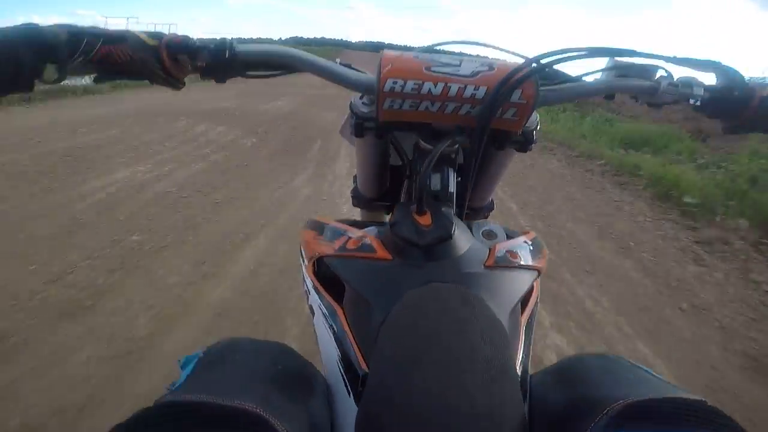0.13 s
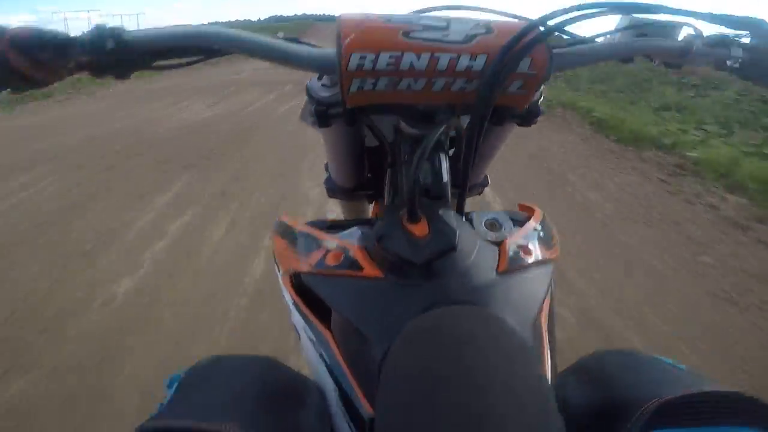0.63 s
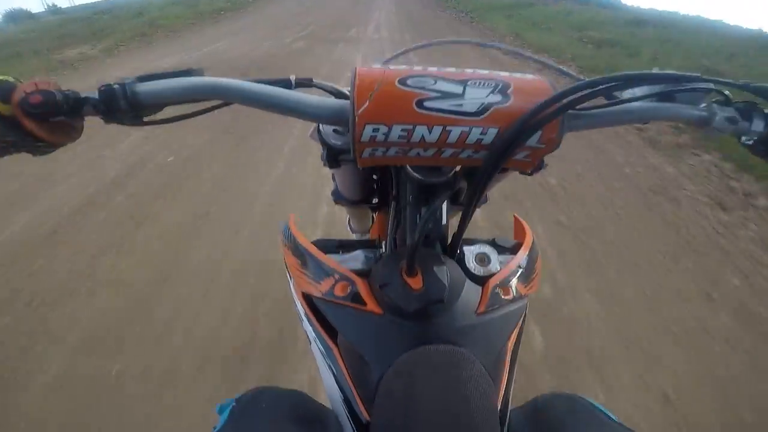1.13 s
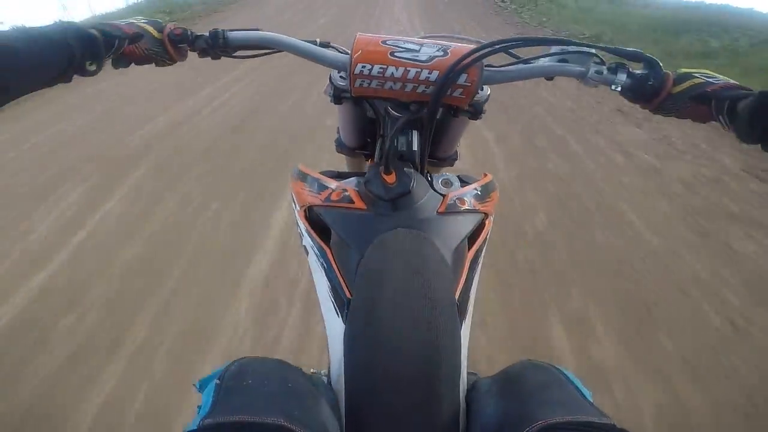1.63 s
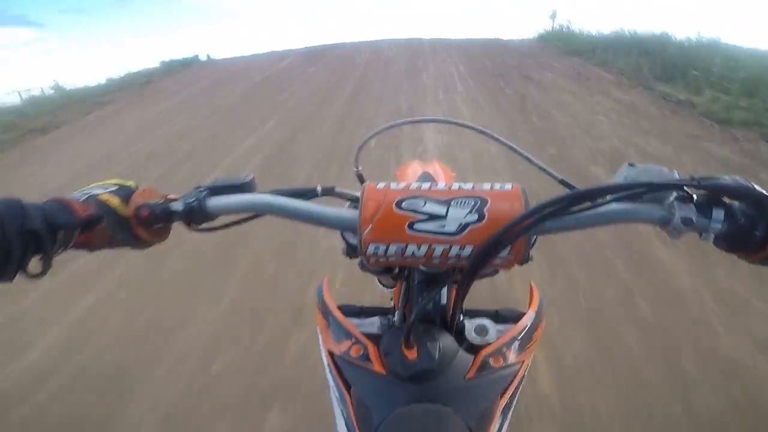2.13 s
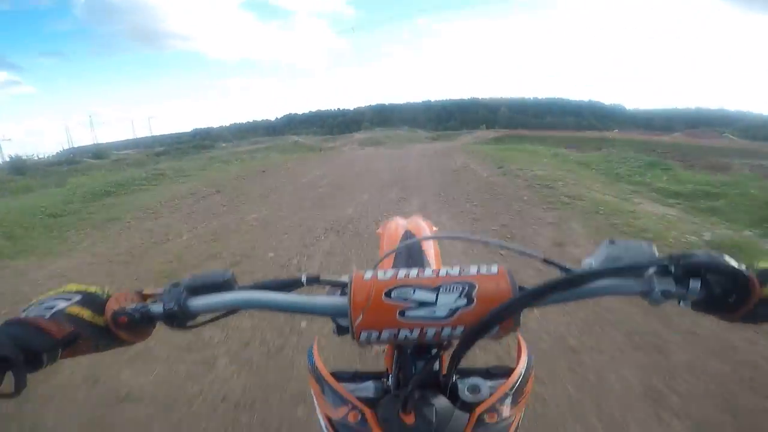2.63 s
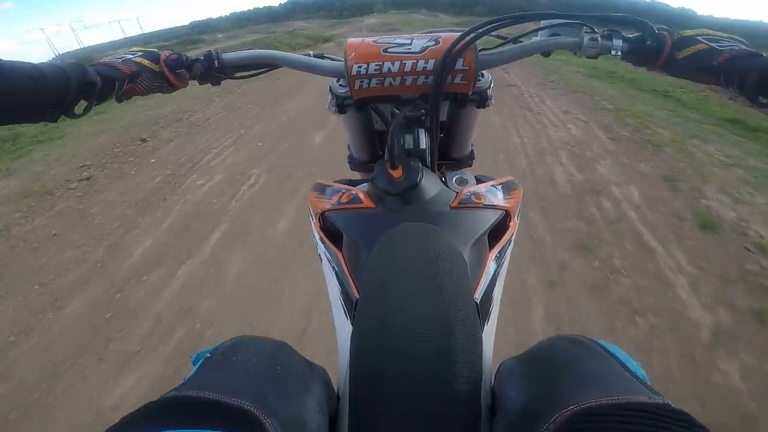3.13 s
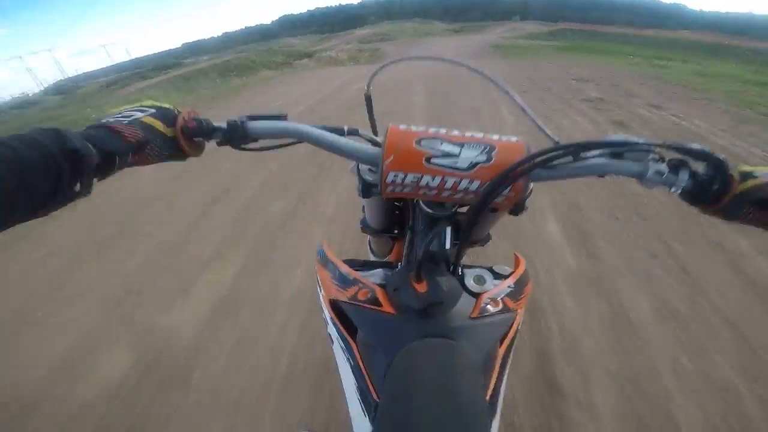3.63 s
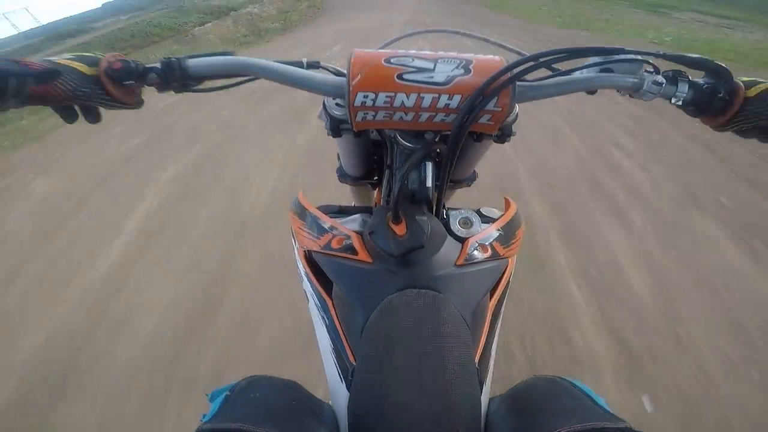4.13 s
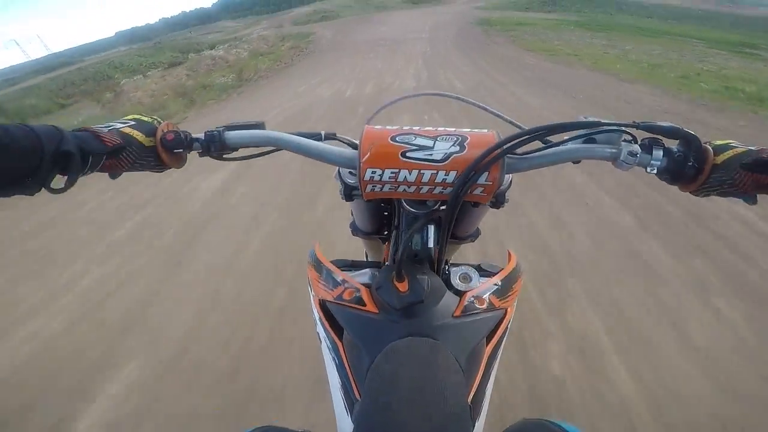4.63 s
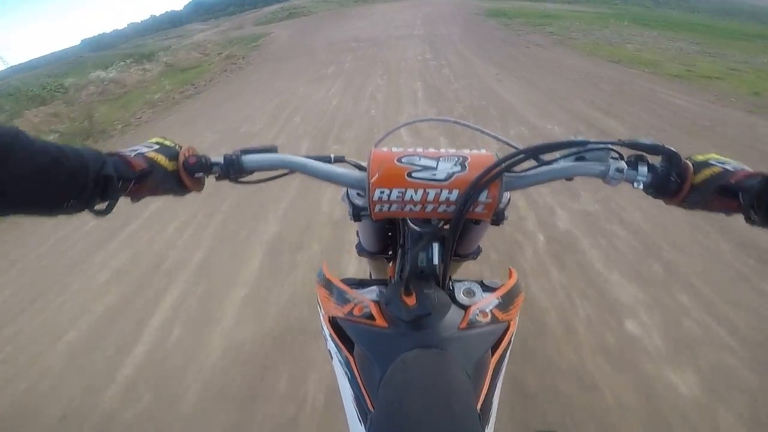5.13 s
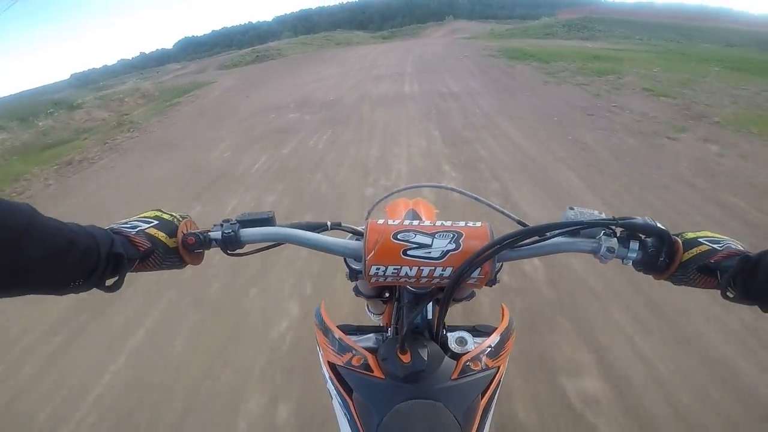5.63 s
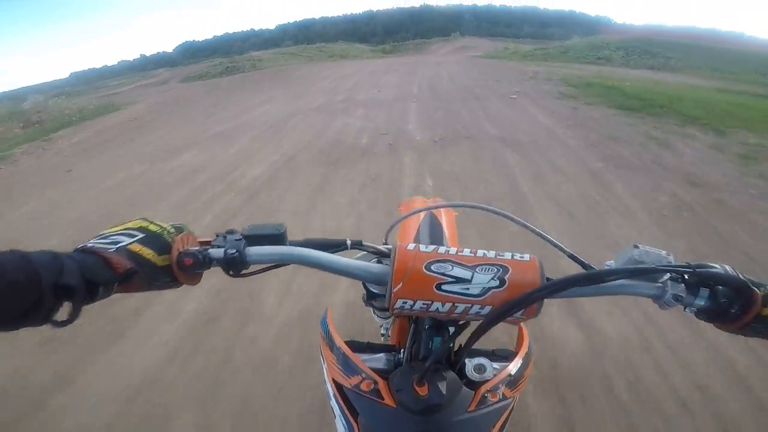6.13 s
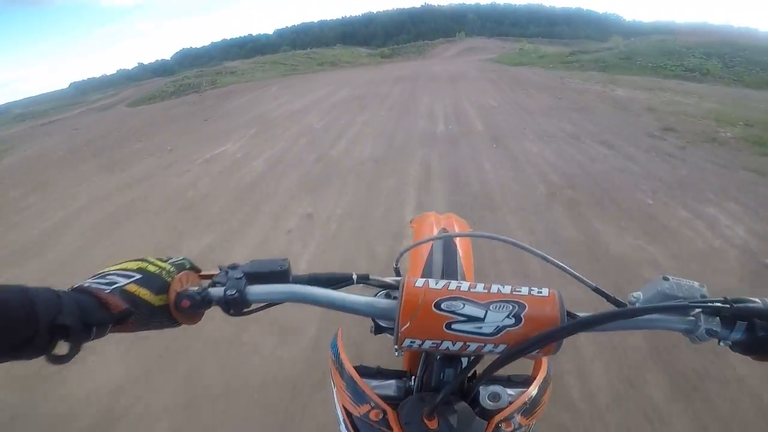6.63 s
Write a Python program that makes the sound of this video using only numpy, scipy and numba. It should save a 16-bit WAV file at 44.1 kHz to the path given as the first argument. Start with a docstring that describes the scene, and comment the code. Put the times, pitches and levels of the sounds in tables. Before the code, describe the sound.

Close onboard four-stroke motorbike: throaty exhaust revs in bursts, low wind thumps the microphone, hard bumps knock, then slow coasting putts.

```python
"""On a rider crossing rough ground, a cased camera hears the single-cylinder four-stroke dirt bike beneath.
Multiples of the firing rate excite the exhaust resonances; near idle each firing rings the pipe by itself.
Noise pulsing with the engine cycle passes through the case resonances as motor clatter. Wind noise buffets
the port, panel and case hum in narrow bands, and bumps push the mount and ring its modes.
One port hears it all; near the end the air noise of a second port fades in."""
import sys
import numpy as np
from scipy import signal
from scipy.fft import rfft, irfft
from scipy.io import wavfile
from scipy.ndimage import uniform_filter1d, minimum_filter1d
from numba import njit

SR = 44100
rng = np.random.default_rng(int(sys.argv[2]) if len(sys.argv) > 2 else 0)


def output_pcm(signal):
    """Save a mono or channel-first signal as 16-bit PCM at the path in sys.argv[1].

    Samples are clipped to [-1, 1] before scaling.
    """
    pcm = np.clip(np.atleast_2d(signal).T, -1, 1) * 32767
    wavfile.write(sys.argv[1], SR, np.round(pcm).astype(np.int16))


def linear_from_db(decibels):
    """Turn decibels (scalar or array-like) into linear amplitude factors; 0 gives 1."""
    return 10 ** (np.asarray(decibels, float) / 20)


N = 298116
T = np.arange(N) / SR


def unit(x):
    """Normalization: scale to rms 1."""
    return x / np.sqrt(np.mean(x ** 2))


def curves(table):
    """Linear interpolation: the columns of a table as sample-rate curves."""
    s, *columns = np.transpose(table)
    return [np.interp(T, s, c) for c in columns]


def colour(x, points):
    """Spectral shaping: zero-phase gain through (f/Hz, gain/dB) points on a logarithmic frequency axis."""
    hz, db = np.transpose(points)
    f = np.maximum(np.fft.rfftfreq(N, 1 / SR), 1)
    gain = linear_from_db(np.interp(np.log(f), np.log(hz), db))
    return irfft(rfft(x) * gain, N)


def walk(rate):
    """Slow random fluctuation: levels held 1 / rate s, smoothed twice over that time, rms 1."""
    k = int(SR / rate)
    held = np.repeat(rng.standard_normal(N // 40)[:N // k + 1], k)
    return unit(uniform_filter1d(uniform_filter1d(held, k), k)[:N])


@njit
def svf(x, hz, width):
    """State-variable resonator: a band-pass with a moving centre and gain 1 there."""
    y, b, l = np.empty(len(x)), 0., 0.
    for i in range(len(x)):
        g, k = np.tan(np.pi * hz[i] / SR), width / hz[i]
        v = (b + g * (x[i] - l)) / (1 + g * (g + k))
        b, l, y[i] = 2 * v - b, l + 2 * g * v, k * v
    return y


def band(x, hz, width):
    """Second-order resonance: band-pass at a fixed or moving centre."""
    return svf(x + 1e-18, hz + np.zeros(len(x)), 1. * width)


def tone(f, hz, width):
    """Lorentzian resonance: complex response, 1 at its centre."""
    return 1 / (1 + 2j * (f - hz) / width)


def steep(x, hz, kind, order=4):
    """Butterworth filtering: maximally flat passband."""
    return signal.sosfilt(signal.butter(order, hz, kind, fs=SR, output="sos"), x)


def wind():
    """Turbulent pressure on the port: lumpy low noise thuds and flaps under a rush, hollow note and hiss."""
    # wind on the port: t/s, deep buffet level/dB, flap level/dB, rush level/dB
    wind_levels = [(0.0, -22, -19.5, -30.5), (0.26, -17.5, -16.5, -38), (0.45, -18, -21.5, -27.5),
                   (0.8, -16, -20.5, -31), (0.97, -24.5, -13.5, -45), (1.09, -24.5, -32, -42),
                   (1.3, -29, -22, -39.5), (1.6, -20, -22, -38), (1.98, -20.5, -16.5, -35.5),
                   (2.33, -21, -17.5, -41.5), (2.62, -19.5, -24, -46.5), (2.85, -18, -18, -32.5),
                   (3.12, -24, -19, -31), (3.3, -28, -21, -33), (3.52, -20, -20, -33),
                   (3.6, -16.5, -16, -31), (3.75, -25.5, -24, -35.5), (3.87, -11, -21, -51),
                   (3.96, -27.5, -29, -54), (4.37, -29.5, -23, -39), (4.74, -21, -22, -40),
                   (5.0, -17.5, -18, -35.5), (5.5, -19.5, -19.5, -38.5), (5.76, -20, -21.5, -42),
                   (5.92, -26, -19, -40), (6.16, -18.5, -18, -38.5), (6.6, -16.5, -21, -41),
                   (6.76, -21.5, -23, -56)]
    # relative spectrum of the eddies: f/Hz, density/dB per Hz
    buffet_spectrum = [(8.8, -61.5), (15, 1), (60, -8), (103, -14.5), (130, -15), (146, -21), (240, -27),
                       (346, -35), (500, -67.5), (650, -52.5), (1100, -120)]
    # hollow note in the rush: t/s, f/Hz, level/dB
    hollow_note = [(4.6, 620, -51), (4.9, 710, -41), (5.02, 694, -39), (5.11, 780, -33.5), (5.2, 782, -42),
                   (5.31, 644, -36), (5.45, 592, -58)]
    # thin air hiss that grows late: t/s, level/dB
    hiss_level = [(0, -76.5), (4.4, -78.5), (5.0, -68.5), (5.8, -68), (6.3, -67.5), (6.76, -67.5)]
    deep_db, flap_db, rush_db = curves(wind_levels)
    whistle_hz, whistle_db = curves(hollow_note)

    lumps = linear_from_db(1.2 * walk(22))
    buffet = colour(rng.standard_normal(N) * lumps, buffet_spectrum)
    deep = unit(steep(buffet, 60.0, "low"))
    flap = unit(steep(buffet, 72.3, "high") - 0.11 * steep(buffet, 250, "high", order=1))
    thuds = linear_from_db(deep_db) * deep + linear_from_db(flap_db) * flap

    air = rng.standard_normal(N) * linear_from_db(2.14 * walk(35)) * lumps ** 0.16
    rush = linear_from_db(rush_db) * unit(band(band(air, 500, 600), 463, 500))
    whistle = band(band(rng.standard_normal(N), whistle_hz, 130), whistle_hz, 240)
    whistle = linear_from_db(whistle_db) * unit(whistle)
    hiss = steep(band(rng.standard_normal(N), 8000, 5000), [7000, 14000], "band")
    hiss = linear_from_db(curves(hiss_level)[0]) * unit(hiss)
    return thuds + steep(rush + whistle, 1800, "low") + hiss


def second_port():
    """Incoherent noise at a second inlet: independent middle and side airs fade in together."""
    # second port fading in: t/s, difference level/dB
    fade = [(5.56, -74), (5.68, -44), (5.9, -39.5), (6.3, -32.5), (6.76, -31)]
    # relative spectrum of its air noise: f/Hz, density/dB per Hz
    air_spectrum = [(35, -24), (60, 7.5), (191, -6), (400, -3), (497, -1.5), (555, -3.5), (721, 0),
                    (1090, -10), (1240, -3), (1450, 0.5), (1900, -9.5), (2300, -9), (2910, -10.5),
                    (4310, -24.5), (6240, -18), (7270, -36), (11000, -45), (14300, -74), (22000, -120)]
    airs = [unit(colour(rng.standard_normal(N), air_spectrum)) for _ in range(2)]
    level = linear_from_db(curves(fade)[0] + 1.2 * walk(30)) * (T > fade[0][0])
    centre, side = level * np.array(airs)
    return 0.48 * centre, side


def hum(hz, width, db):
    """Narrow-band resonance: three band-passes on noise hold one pitch whatever the engine speed."""
    noise = band(rng.standard_normal(N), hz, 4 * width)
    return linear_from_db(db) * unit(band(band(noise, hz, width), hz, width))


def panel():
    """Structural resonance: a panel hums under load and the case rings at full throttle."""
    # panel of the bike under load: t/s, level/dB
    panel_level = [(1.15, -60), (1.22, -42.5), (1.36, -39.5), (1.45, -41.5), (1.75, -33.5), (1.84, -33.5),
                   (1.95, -27), (2.02, -47), (3.38, -53), (3.47, -23.5), (3.54, -41), (3.65, -65)]
    # rings of the case: f/Hz, width of the narrow filters/Hz
    case_rings = [(2800, 110), (3085, 77), (3610, 49), (12600, 1500)]
    # levels of those rings: t/s, first to fourth ring level/dB
    case_ring_levels = [(3.08, -62, -56, -63, -100), (3.15, -37, -42, -58, -79), (3.22, -35, -46, -49, -76),
                        (3.28, -28, -38, -57, -67.5), (3.34, -30, -32, -39, -76), (3.4, -28, -36, -39, -62),
                        (3.45, -29, -19, -36.5, -68.5), (3.5, -40, -37, -45, -65),
                        (3.56, -48, -39, -48, -61), (3.62, -52, -43, -47, -75), (3.68, -65, -68, -67, -100)]
    out = hum(572, 30, curves(panel_level)[0])
    for (hz, width), db in zip(case_rings, curves(case_ring_levels)):
        out = out + hum(hz, width, db)
    return out


def knocks():
    """Modal impact: a bump rattles the mount's upper modes, then pushes it and rings the lower ones."""
    # bumps on the mount: t/s, overall level/dB, edge level/dB, length of the push/ms
    bumps = [(0.229, -18, 0.5, 9.6), (0.305, -17, -3, 15), (0.567, -6, -11, 4.6), (0.81, -6, -9, 5.9),
             (0.823, -1.5, -13.5, 14), (0.9185, -15.5, 5.5, 1.8), (0.994, -3.5, -17, 5.06),
             (2.217, -36, 0, 7.1), (2.386, -7.5, -23, 10.4), (3.652, -10, -18, 3.2), (3.667, -2.5, -2, 1.4),
             (3.718, -31, 11, 2.75), (3.7803, -4, 0, 3.4), (3.794, -10, -16, 8.4), (3.829, -24, -1, 3),
             (3.8377, -4, -8, 4.5), (3.857, -16, -24, 14), (4.4348, -36, 19, 4.9), (4.448, -19.5, -2, 4.9)]
    # modes of the mount before scatter and edge: f/Hz, level/dB, 60 dB decay time/s
    modes = [(65.91, -3.5, 0.1), (105, 5.5, 0.07), (223, -4, 0.05), (315, -5, 0.04), (500, -7, 0.027),
             (640, -6, 0.04), (770, -11, 0.035), (930, -14, 0.014), (1300, -20, 0.011)]
    lead_s, rattle_s = 0.00324, 0.0031  # rattle ahead of the push; time of its peak
    out, t = np.zeros(N + SR), np.arange(SR // 5) / SR
    late = np.maximum(t - lead_s, 0)
    detuning = 0.049 * rng.standard_normal((len(bumps), len(modes)))
    noise = steep(rng.standard_normal((len(bumps), len(t))), [350, 1150], "band", order=3)
    cracks = noise * t / rattle_s * np.exp(1 - t / rattle_s)
    for (s, db, edge_db, ms), shifts, crack in zip(bumps, detuning, cracks):
        push = -np.sin(np.pi * np.clip(late / (ms / 1000), 0, 1)) ** 2
        ring = 0
        for (f, mode_db, t60), shift in zip(modes, shifts):
            u = t if f > 550 else late  # upper modes start ahead of the push
            size = linear_from_db(mode_db + edge_db * min(f / 600, 1))
            envelope = 1000 ** (-u / t60) * (1 - np.exp(-u / 0.00093))
            ring = ring + size * np.sin(2 * np.pi * f * (1 + shift) * u) * envelope
        i = int(s * SR)
        out[i:i + len(t)] += linear_from_db(db) * (0.78 * push - 1.15 * ring + linear_from_db(edge_db) * crack)
    return steep(out[:N], 2300, "low")


def motor(phase):
    """Source-filter principle: cyclic, partly repeating clatter rattles through the case resonances."""
    # motor, chain and tyres: t/s, clatter level/dB, rasp level relative to it/dB
    clatter_levels = [(0.0, -38, -3), (0.06, -36, -3.5), (0.19, -42, -5), (0.33, -38.5, -3),
                      (0.46, -34.5, 0), (0.82, -35.5, -2.5), (0.832, -44, 1), (0.9, -41.5, 0.5),
                      (0.93, -39.5, -4), (1.15, -40.5, -1), (1.26, -43, -2.5), (1.75, -35, -1.5),
                      (2.0, -39, -1), (2.4, -40, -7), (2.6, -39, -6.5), (3.09, -37.5, -1.5),
                      (3.115, -35, -1.5), (3.2, -31.5, -3.5), (3.33, -32, -1.5), (3.44, -30, 0),
                      (3.57, -29, -3.5), (3.62, -37.5, -3.5), (3.8, -44.5, -1.5), (4.07, -45.5, -4),
                      (4.56, -46, -1.5), (5.2, -44.5, 1.5), (5.5, -42.5, -0.5), (6.21, -42.5, -2.5),
                      (6.6, -41.5, -3.5), (6.76, -34.5, -5)]
    # resonances of the case: f/Hz, width before widening/Hz, level/dB
    case_modes = [(1388, 210, 0), (1826, 73, 5), (2771, 49, 5.5), (3050, 140, 3), (3527, 60, -2),
                  (4130, 98, -14), (5350, 85, -15.5), (6090, 180, -8), (7380, 220, -18.5),
                  (8600, 120, -25.5), (12700, 500, -30)]
    # broad response of the case before scaling: f/Hz, gain/dB
    case_bed = [(470, -21.5), (800, 3), (994, -14.5), (1250, 4.5), (1480, -20), (1840, -2), (2370, -15),
                (2810, -1), (3580, -6), (3890, -11.5), (5020, -10), (6390, -2.5), (9750, -23.5),
                (12700, -52), (14400, -65)]
    # treble relative to the clatter: t/s, level/dB
    treble_level = [(0.0, -11), (0.2, -15), (0.45, -11.5), (1.26, -11.5), (1.75, -15), (2.45, -15.5),
                    (2.7, -10.5), (3.0, -13), (3.5, -11), (3.8, -13), (5.1, -15.5), (5.25, -13),
                    (5.4, -16.5), (6.6, -15), (6.76, -16)]
    # single clanks: t/s, rise added to the steady clatter/dB
    clank_levels = [(0.823, 4), (3.204, 8), (3.663, 14.5), (5.27, 4)]
    db, rasp_db = curves(clatter_levels)
    over_db = db + 35
    top_db = db - 36 + 0.1 * over_db
    parts = [(0, 2400, db), (2400, 4900, db + rasp_db),
             (4900, 9500, db + curves(treble_level)[0]), (9500, 16000, top_db)]  # Hz, Hz, dB
    clanks = 1 + sum(linear_from_db(g) * np.exp(-abs(T - s) / 0.0018) for s, g in clank_levels)
    pulsing = np.exp(0.17 * np.sin(2 * np.pi * phase) + 0.12 * np.sin(4 * np.pi * phase))

    f = np.fft.rfftfreq(N, 1 / SR)
    case = linear_from_db(-4.5) * rfft(colour(1. * (T == 0), case_bed))
    for hz, width, g in case_modes:
        case = case + linear_from_db(g) * abs(tone(f, hz, (1.83 + hz / 8000) * width)) ** 2

    # one short noise burst, the same at every turn of the cycle
    t = np.arange(SR // 40) / SR
    burst = rng.standard_normal(len(t)) * t * np.exp(-2 * t / 0.011)
    cycle_starts = 1. * (np.diff(phase, prepend=0) < 0)
    strokes = unit(signal.oaconvolve(cycle_starts, burst)[:N])
    strokes = linear_from_db(-4 + 0.35 * over_db) * strokes  # the repeating share grows with the clatter

    rattle, out = walk(38), 0  # rough ground moves all bands together
    for lo_hz, hi_hz, part_db in parts:
        noise = rng.standard_normal(N) * pulsing * clanks + strokes
        noise = noise * linear_from_db(0.5 * rattle + 0.92 * walk(45))
        body = rfft(noise) * case * (f >= lo_hz) * (f < hi_hz)
        out = out + linear_from_db(part_db) * unit(irfft(body, N))
    return out


def lone_putts():
    """Impulse response: near idle each firing rings the damped notes of the pipe once."""
    # firings one at a time: t/s, level/dB
    firings = [(4.725, -19), (4.788, -20), (4.855, -18.5), (5.047, -28), (5.129, -20), (5.173, -15.5),
               (5.254, -20), (5.316, -20), (5.371, -32), (5.424, -16.5), (5.477, -16.5), (5.529, -13.5),
               (5.572, -15), (5.613, -10.5), (5.647, -15.5), (5.679, -11), (5.71, -15.5), (5.739, -15.5),
               (5.772, -22), (5.803, -22.5), (5.835, -23), (5.868, -22), (6.391, -15), (6.437, -13),
               (6.484, -16.5), (6.53, -15.5), (6.575, -18.5), (6.619, -14), (6.662, -13.5), (6.699, -12.5),
               (6.733, -11)]
    # notes of the pipe before scatter: f/Hz, level/dB, exponential fall time/s
    pipe_notes = [(190, -2.5, 0.0076), (298.5, 5.5, 0.0048), (500, -4, 0.0048), (620, -13.5, 0.0039)]
    out, t = np.zeros(N + SR), np.arange(SR // 10) / SR
    rise = 1 - np.exp(-t / 0.0023)
    detuning = 0.038 * rng.standard_normal((len(firings), len(pipe_notes)))
    for (s, db), shifts in zip(firings, detuning):
        ring = 0
        for (hz, g, fall), shift in zip(pipe_notes, shifts):
            ring = ring + linear_from_db(g) * np.exp(-t / fall) * np.sin(2 * np.pi * hz * (1 + shift) * t)
        i = int(s * SR)
        out[i:i + len(t)] -= linear_from_db(db) * rise * ring
    return out[:N]


def exhaust():
    """Harmonic excitation of resonances, plus gas noise once a cycle; returns sound and cycle position."""
    # engine speed, wavering as the rear wheel grips and slips: t/s, firing rate before smoothing/Hz
    speed = [(0.0, 48.25), (0.14, 50.6), (0.3, 46.67), (0.46, 51.12), (0.537, 45.75), (0.65, 55.17),
             (0.767, 47.63), (0.845, 55.24), (0.918, 52.63), (0.962, 51.4), (1.006, 56.3), (1.11, 72.9),
             (1.166, 67.27), (1.26, 55.34), (1.338, 55.98), (1.41, 62.2), (1.488, 59.6), (1.602, 70.23),
             (1.688, 62.44), (1.772, 67.2), (1.85, 61.77), (1.976, 61.7), (2.08, 55.36), (2.22, 58),
             (2.38, 55.14), (2.57, 51.55), (2.72, 53.73), (2.8, 50.52), (2.88, 49.27), (3.02, 43.3),
             (3.12, 43.78), (3.284, 62.73), (3.384, 75), (3.434, 80.63), (3.49, 84.82), (3.555, 81.7),
             (3.604, 71.5), (3.66, 59.7), (3.8, 49.4), (3.924, 43.64), (4.07, 41.14), (4.268, 40.66),
             (4.474, 40), (4.652, 35.2), (4.75, 33.05)]
    # exhaust under way: t/s, pipe note level/dB, pipe note f/Hz, low boom level/dB, low boom f/Hz
    exhaust_notes = [(0.0, -9.5, 281, -16, 193), (0.07, -7.5, 280, -38, 190), (0.13, -40, 274, -22.5, 192),
                     (0.32, -18, 256, -41, 190), (0.44, -7.5, 278, -44, 199), (0.56, -7, 277, -41, 199.7),
                     (0.64, -10, 295.5, -28, 210), (0.71, -10, 289, -25, 213),
                     (0.79, -8.5, 287, -35, 210.4), (0.87, -11.5, 296.4, -42, 198.4),
                     (1.0, -15.5, 281.6, -39, 203.9), (1.1, -15.5, 272, -22, 210),
                     (1.26, -16.5, 269, -23.5, 200.3), (1.5, -9.5, 271.3, -17, 199),
                     (1.62, -12, 271, -15.5, 200.2), (1.77, -9.5, 268, -21, 201),
                     (1.86, -10, 277, -25, 189.8), (1.96, -14.5, 256, -43, 191.8),
                     (2.03, -30, 298, -30, 199.8), (2.3, -28.5, 276, -25.5, 209.7),
                     (2.5, -27, 283, -32.5, 204.5), (2.7, -29, 279, -27.5, 205.9),
                     (2.8, -22.5, 263, -18, 151), (3.04, -26, 260, -13, 125.2),
                     (3.14, -17, 247, -14, 119.6), (3.29, -7, 245, -20.5, 129), (3.4, -7, 284, -12, 149.5),
                     (3.52, -12, 299, -17, 164.7), (3.6, -18, 285, -17.5, 159.1),
                     (3.84, -48, 286, -51, 199), (3.9, -31, 285, -30, 205), (4.15, -31, 280, -29, 200),
                     (4.4, -31, 260, -28, 190), (4.58, -33, 255, -29, 185), (4.75, -52, 258, -37, 204)]
    # bark above the pipe note: t/s, level/dB, f of its lowest note/Hz
    bark_levels = [(0.0, -42, 500), (0.13, -56, 500), (0.33, -35, 475), (0.47, -38, 495), (0.8, -30.5, 540),
                   (1.05, -40, 556), (1.25, -46, 580.3), (1.5, -33, 582.7), (1.7, -29.5, 558.4),
                   (1.93, -37, 556.6), (2.05, -55, 519.8), (2.55, -52, 490), (2.68, -28, 459),
                   (2.8, -39, 398.2), (2.95, -32.5, 324.8), (3.08, -36, 329.6), (3.15, -24, 450),
                   (3.25, -20, 420), (3.35, -17, 400), (3.48, -15, 440), (3.55, -19, 430), (3.6, -34, 430),
                   (3.9, -59, 478.3), (4.75, -53, 479.2)]
    # fixed silencer resonances: f/Hz, width/Hz, level relative to the pipe note/dB
    silencer = [(190, 90, -13), (350, 55, -11)]
    # fixed bark resonances: f/Hz, width/Hz, level relative to the bark/dB
    bark_modes = [(570, 100, -5), (770, 300, -14), (1340, 360, -19), (1800, 220, -19)]
    # silencer notes stand out off throttle: t/s, added level/dB
    overrun = [(1.96, -4.5), (2.05, 7), (2.4, 5.5), (2.65, 2.5), (2.85, 2.5), (3.0, 2.5), (3.12, -1),
               (3.84, 0), (3.92, 0.5), (4.3, 2), (4.7, 5.5)]
    scatter_db, jitter_cycles = 1.0, 0.006  # rms scatter of firing level and timing
    smear = 1.2  # how far the pipe spreads a firing in time

    on = slice(int(speed[0][0] * SR), int(speed[-1][0] * SR))
    hz = uniform_filter1d(curves(speed)[0], int(0.008 * SR))[on]
    db, pipe_hz, boom_db, boom_hz = (c[on] for c in curves(exhaust_notes))
    bark_db, growl_hz = (c[on] for c in curves(bark_levels))
    overrun_db = curves(overrun)[0][on]
    turns = np.cumsum(hz) / SR
    cycles = np.arange(N // 400)
    size = linear_from_db(scatter_db * np.interp(turns, cycles, rng.standard_normal(N // 400)))

    # the harmonics run at a quarter of the rate, their gains at every 128th sample
    coarse, slow = turns[::4], slice(0, None, 128)
    jitter = jitter_cycles * np.interp(coarse, cycles, rng.standard_normal(N // 400))
    spin = np.exp(2j * np.pi * (coarse + jitter))
    pipe_db, bark_slow_db = db[slow], bark_db[slow]
    silencer_db = pipe_db + overrun_db[slow]
    count = int(950 / hz.min())
    sound = 0
    for k in range(1, count):
        f = k * hz[slow]
        pipe = tone(f, pipe_hz[slow], 47.8)
        odd_db = -5 * (k % 2)  # odd multiples of the bark are weaker
        rings = [(pipe, pipe_db), (tone(f, boom_hz[slow], 58), boom_db[slow])]
        rings += [(tone(f, c, w), silencer_db + g) for c, w, g in silencer]
        rings += [(tone(f, c, w), bark_slow_db + g + odd_db) for c, w, g in bark_modes]
        rings += [(tone(f, growl_hz[slow], 73), bark_slow_db - 5.5)]
        power = np.sqrt(sum((linear_from_db(g) * abs(r) ** 2) ** 2 for r, g in rings))  # powers add
        gain = power * np.exp(1j * smear * np.angle(pipe))
        sound = (sound + np.interp(coarse, turns[slow], gain)) * spin.conj()  # nested sum
    sound = signal.resample_poly((sound * spin ** count).real, 4, 1)[:len(hz)]

    puffs = rng.standard_normal(len(hz)) * np.exp(-(turns % 1) / .5)
    gas = steep(unit(band(puffs, pipe_hz, 58)), 900, "low")
    # fade in over the first fortieth of a cycle, out over the last half cycle
    size = size * np.minimum(1, 2 * (turns[-1] - turns)) * np.minimum(1, 40 * turns)
    out = np.zeros((2, N))
    out[:, on] = size * sound + linear_from_db(db - 19) * gas, turns % 1
    return out


def scene():
    """Superposition: all sources share one port; second-port air and delayed top treble split the channels."""
    engine_sound, phase = exhaust()
    mid = wind() + panel() + knocks() + motor(phase) + lone_putts() + engine_sound
    centre, side = second_port()
    top = steep(mid - mid[0], 11300, "high", order=10)
    side = side + 0.84 * np.roll(top, 300)  # delay in samples; opposite sign in the two channels
    mid = mid + centre
    return np.array([mid + side, mid - side])


def roll_off(x):
    """The treble ends steeply here."""
    return signal.sosfilt(signal.butter(12, 14500, fs=SR, output="sos"), x)


def record(dry):
    """Peak limiting: a smoothed look-ahead gain holds both channels under a ceiling without grit."""
    ceiling = 0.93  # of full scale
    room = np.minimum(1, ceiling / (abs(dry).max(axis=0) + 1e-9))
    gain = uniform_filter1d(minimum_filter1d(room, size=441), size=441)  # 10 ms windows
    return roll_off(dry * gain)


dry = scene()
out = record(dry)
output_pcm(out)
```